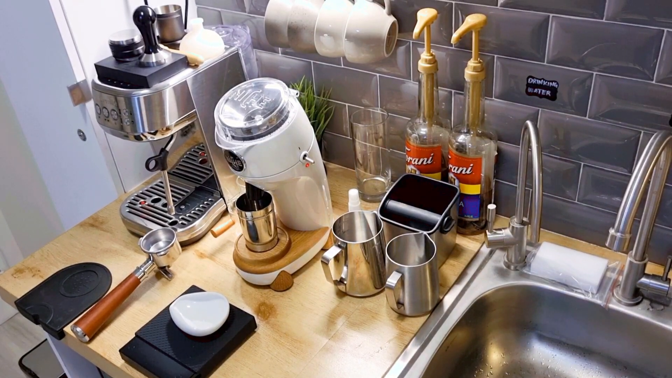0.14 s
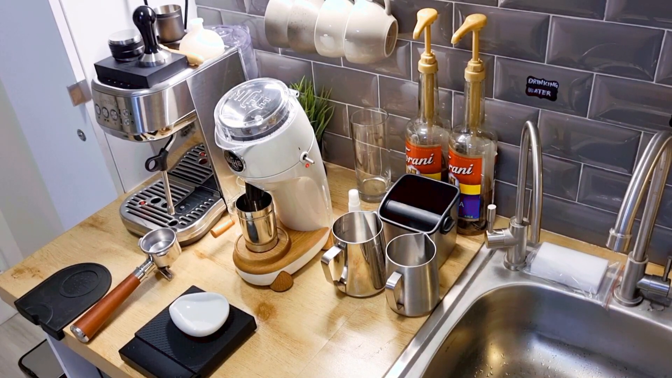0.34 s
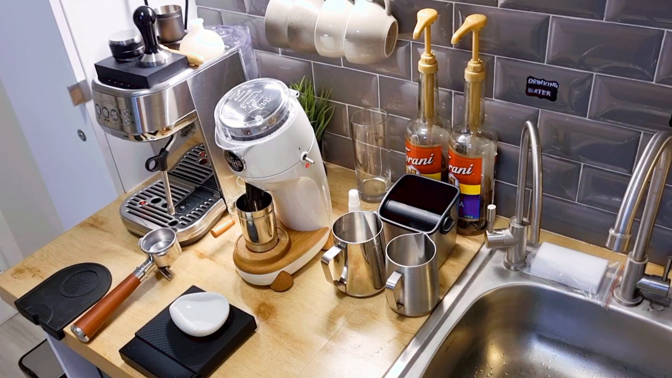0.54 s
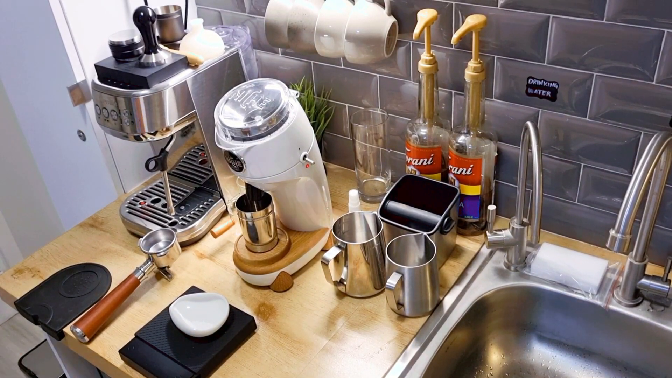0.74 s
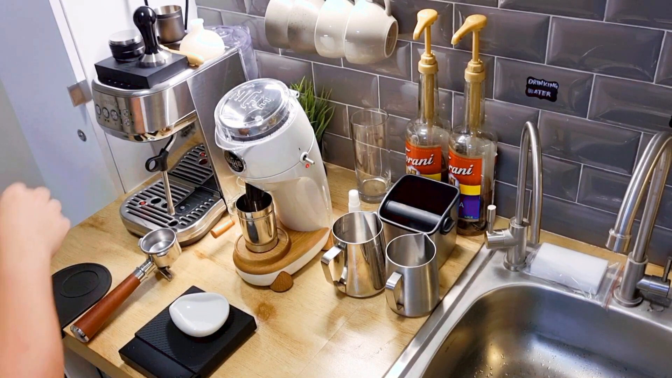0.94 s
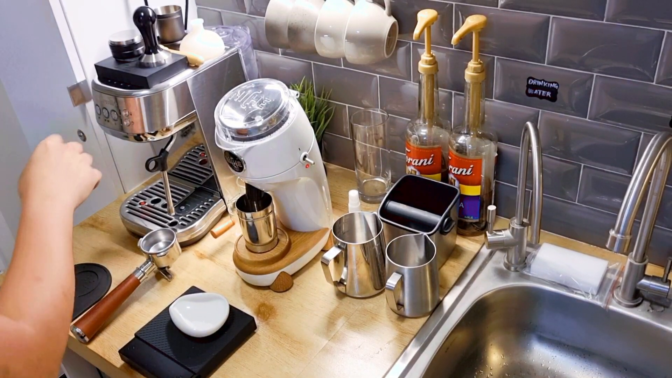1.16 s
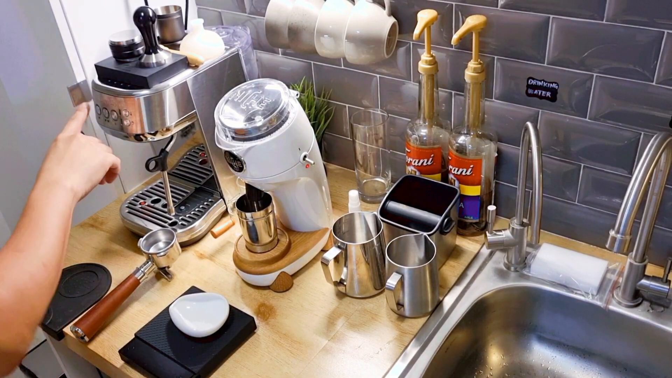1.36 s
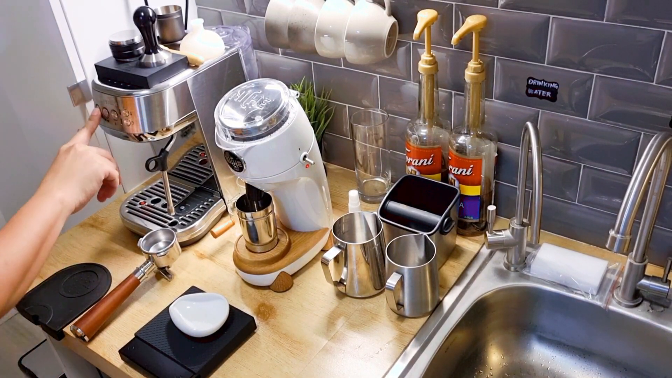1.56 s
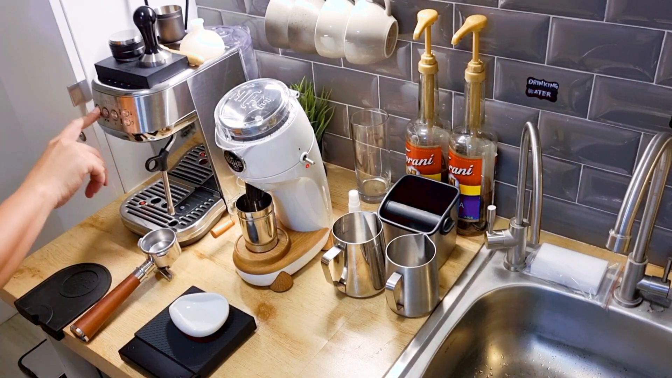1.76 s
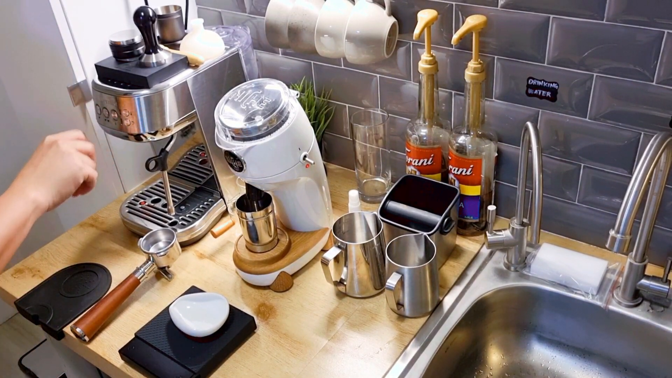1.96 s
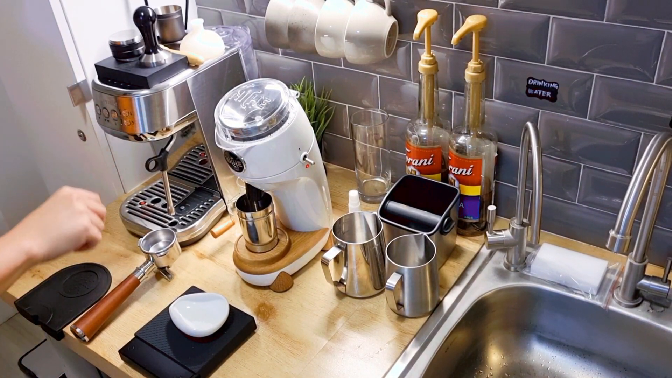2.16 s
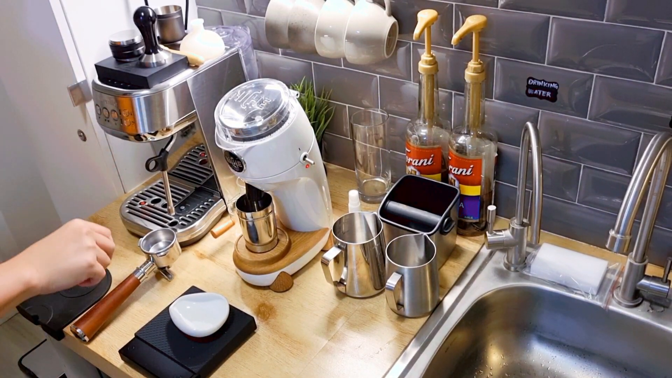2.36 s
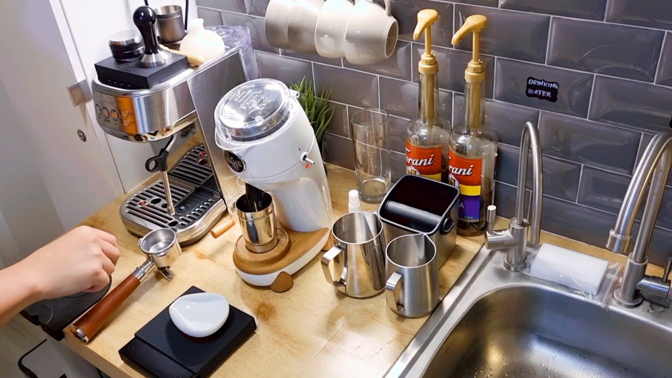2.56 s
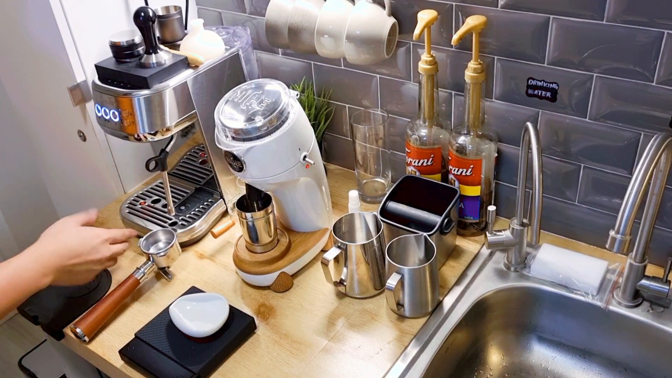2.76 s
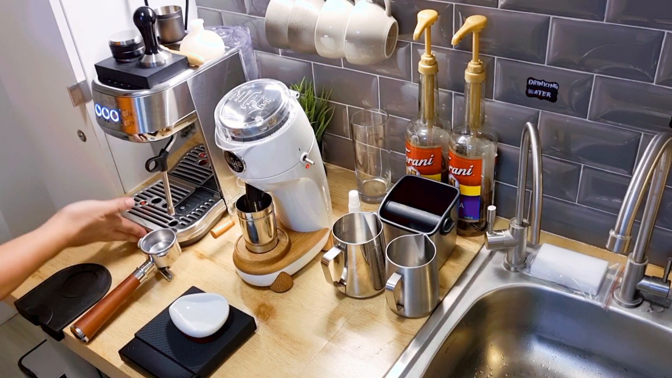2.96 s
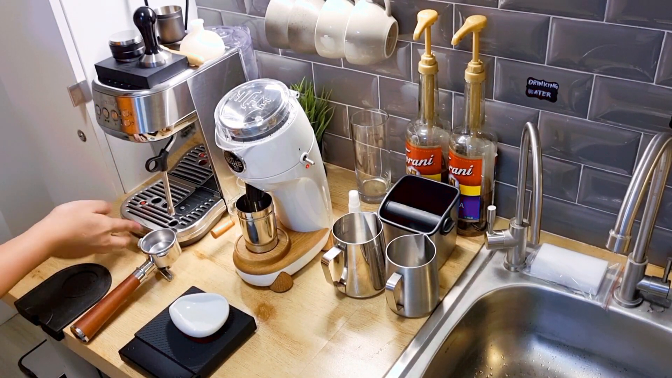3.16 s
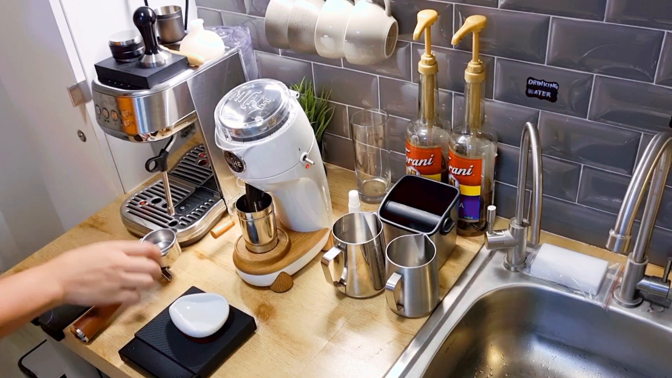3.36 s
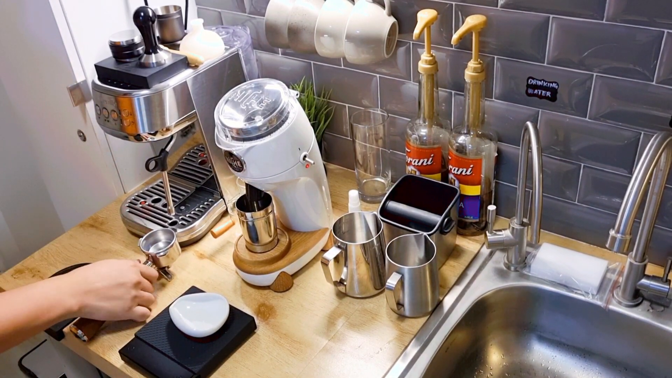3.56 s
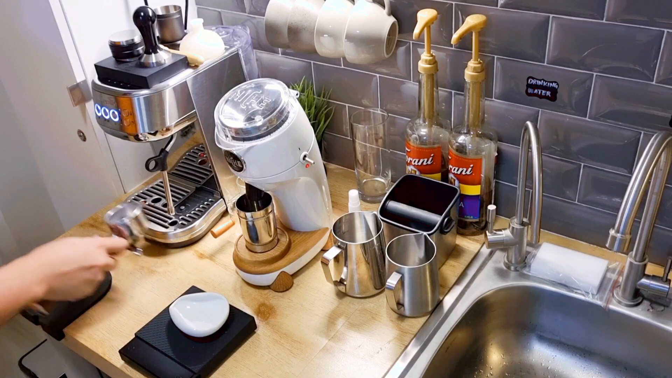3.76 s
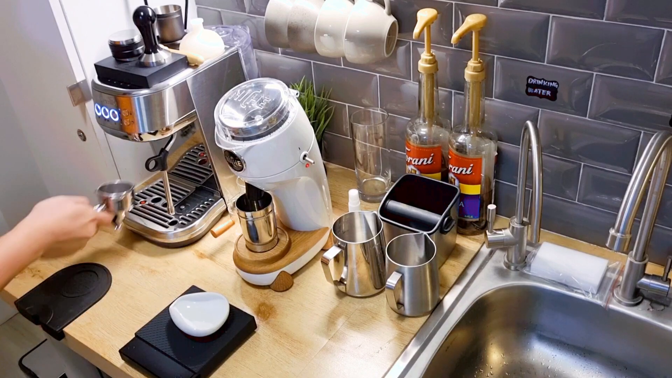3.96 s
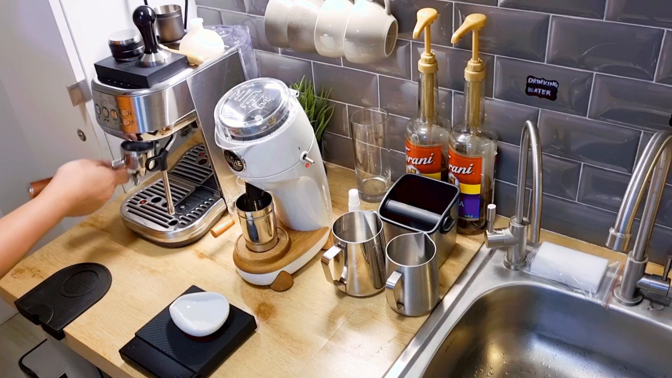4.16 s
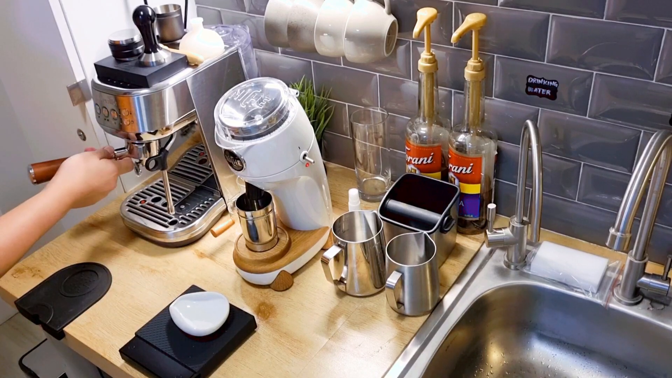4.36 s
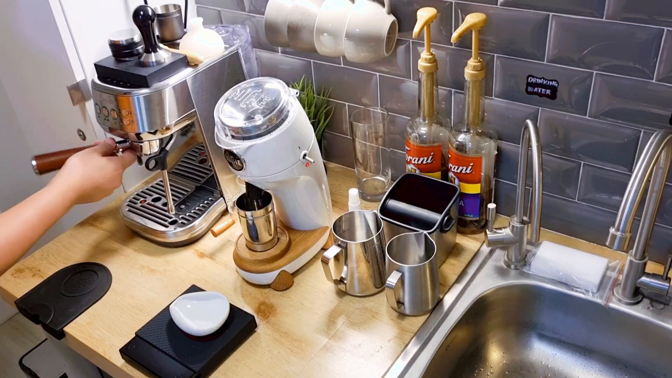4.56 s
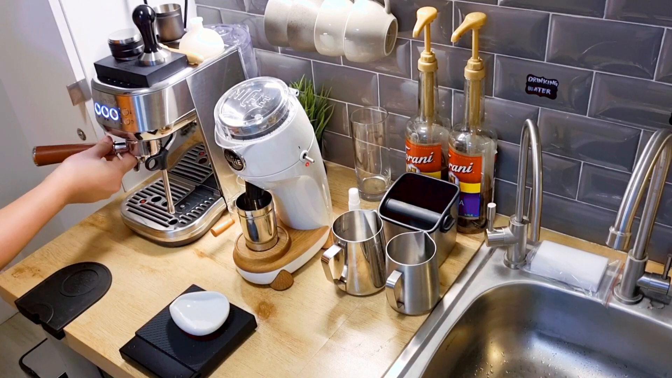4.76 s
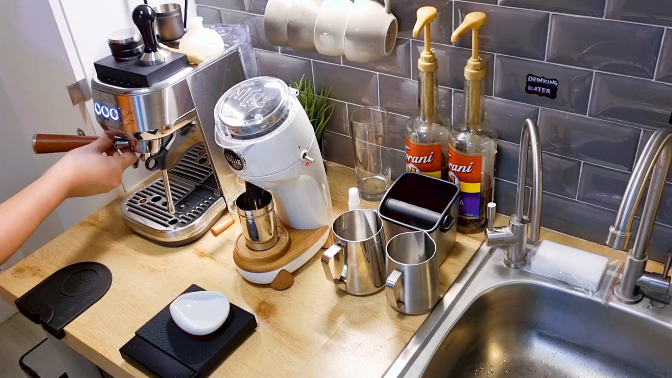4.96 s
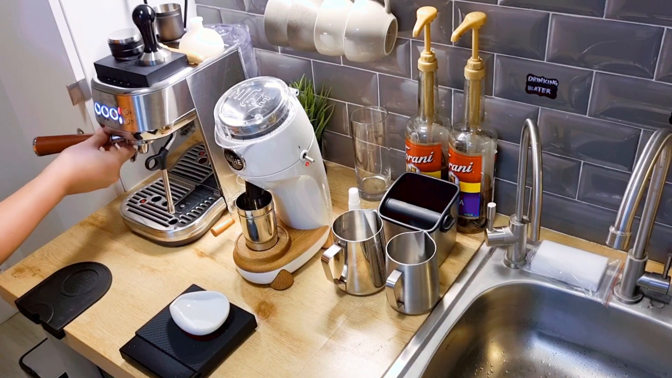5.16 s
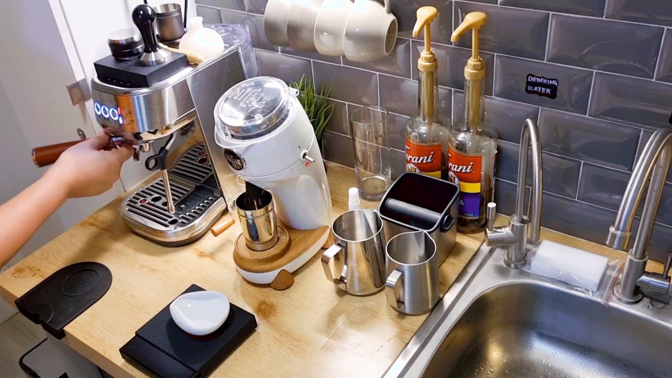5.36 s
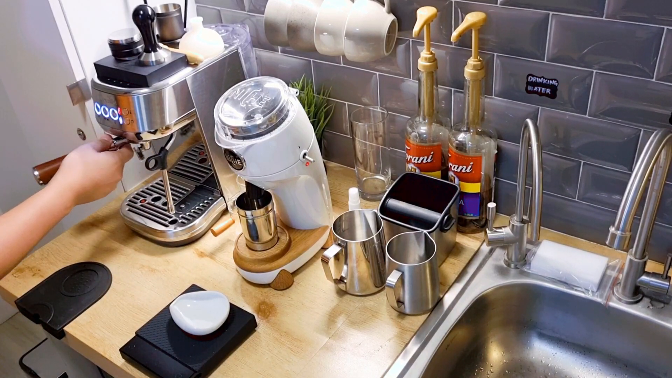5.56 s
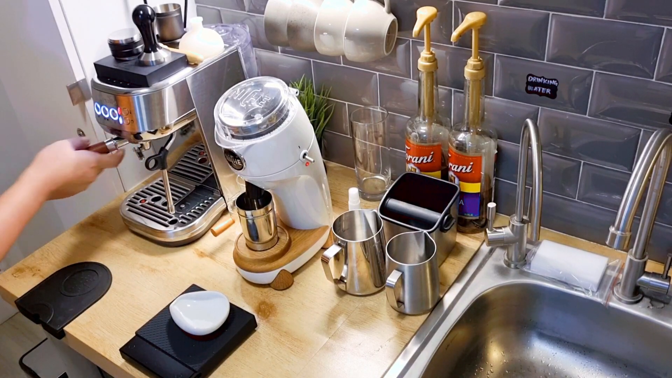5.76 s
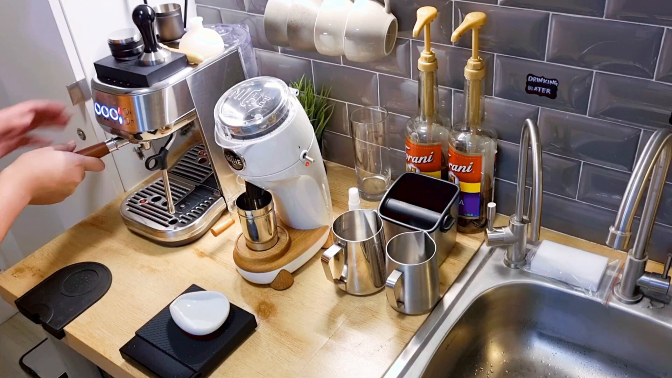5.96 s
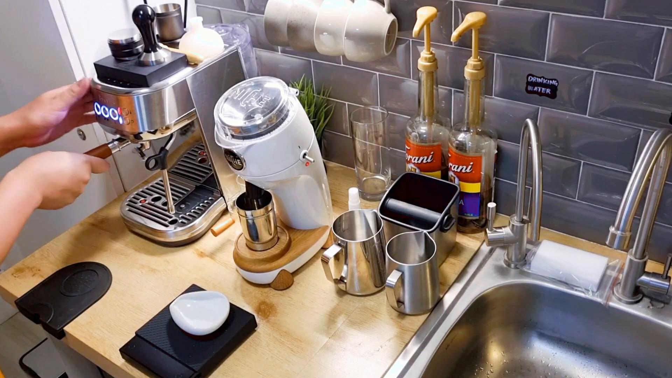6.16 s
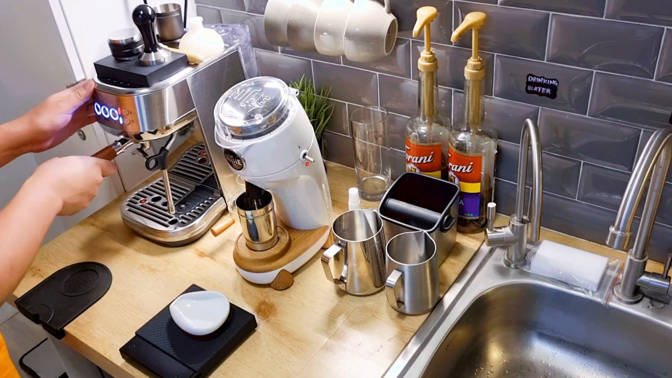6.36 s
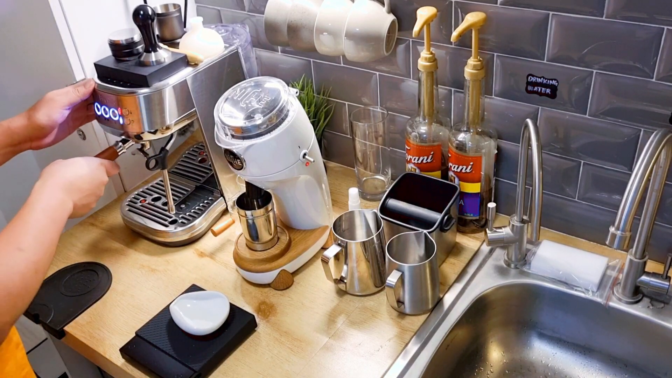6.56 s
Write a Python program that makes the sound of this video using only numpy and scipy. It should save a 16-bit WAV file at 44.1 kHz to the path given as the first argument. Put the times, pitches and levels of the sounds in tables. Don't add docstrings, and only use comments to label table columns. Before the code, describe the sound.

A small tiled kitchen with low, slowly swelling ventilation rumble and soft steady air, heard by spaced stereo microphones with plenty of room. From 0 to 1.4 seconds slippers and sleeves rub in uneven grainy scuffs, strongest near 1.2, with a light sole slap at 1.41. Around 1.7 a tiny tick leads into a tight cluster of switch clicks, snapping sharply at 1.81 and trailing off by 1.9. At 3.03 the drip tray jolts with a brief light rattle. A low counter boom at 3.56 precedes faint portafilter bumps to 3.73. At 4.33 steel strikes steel, the loudest clank, with a short thin ring and a settling knock. Sparse dull bumps follow, then a firm knock at 5.2 and a flurry of muffled twisting knocks from 5.4 to 5.7. Faint cloth rubbing and a tiny finger tap at 6.42 close over the rumble.

```python
import sys
import numpy as np
from scipy import signal
from scipy.fft import rfft, irfft, next_fast_len
from scipy.io import wavfile

SR = 44100
rng = np.random.default_rng(int(sys.argv[2]) if len(sys.argv) > 2 else 0)


def boost(x):
    u = np.asarray(x, float) / 20
    return 10 ** u


def put_to_file(sound):
    columns = np.atleast_2d(sound).T
    safe = np.clip(columns, -1, 1)
    whole_steps = np.round(safe * 32767)
    wavfile.write(sys.argv[1], SR, whole_steps.astype(np.int16))


N = 291501


def rms_one(x):
    return x / np.sqrt(np.mean(x ** 2) + 1e-20)


def at_hz(points, hz):
    curve_hz, value = np.transpose(points)
    return np.interp(np.log(hz + 1), np.log(curve_hz), value)


def coloured(x, spectrum):
    size = next_fast_len(x.shape[-1])
    gain = rms_one(boost(at_hz(spectrum, np.fft.rfftfreq(size, 1 / SR))))
    return irfft(rfft(x, size) * gain, size)[..., :x.shape[-1]]


def drift(rate_hz):
    steps = rng.standard_normal(int(N / SR * 40) + 2)
    smooth = signal.filtfilt([1], [1, -np.exp(-2 * np.pi * rate_hz / 40)], steps)
    return np.interp(np.arange(N) / SR * 40, np.arange(len(steps)), rms_one(smooth - smooth.mean()))


def ring(clicks, hz, t60):
    r = boost(-60 / (t60 * SR))
    w = 2 * np.pi * hz / SR
    return signal.lfilter([0, np.sin(w)], [1, -2 * r * np.cos(w), r * r], clicks + 1e-18)


FIRM_DB = -35


def contacts(table, modes, crack, thump_t60, rise_s, chatter_s, sharper, thump_db, ring_db, crack_db, first_db):
    thump, chatter = np.zeros(N), np.zeros((2, N))
    t = np.arange(4096) / SR
    shape = (len(table), len(t))
    grit = rng.standard_normal(shape) * np.sqrt(rng.exponential(1, shape))
    rise = 1 - np.exp(-t / rise_s)
    for (s, low_db, hz, click_db), clicks in zip(table, grit):
        start = round(s * SR)
        at = slice(start, start + len(t))
        thump[at] += boost(low_db + thump_db - 60 * t / thump_t60) * rise * np.sin(2 * np.pi * hz * t)
        first_touch = boost(first_db) * (t == 0)
        burst = boost(click_db) * (clicks * rise * np.exp(-t / chatter_s) + first_touch)
        firm_crack_db = crack_db + sharper * (click_db - FIRM_DB)
        chatter[:, at] += boost([[ring_db], [firm_crack_db]]) * burst
    rings = sum(boost(db) * ring(chatter[0], hz, t60) for hz, db, t60 in modes)
    return thump + rings + coloured(chatter[1], crack)


# (time [s], thump level [dB], thump pitch [Hz], click level [dB])
CLANK = [
    (4.3245, -42, 323, -26),
    (4.3305, -12.5, 265, -16),
    (4.346, -25, 284, -37),
    (4.383, -17.5, 261, -42.5),
]
# (frequency [Hz], level [dB], t60 [s])
CLANK_MODES = [(400, -7, 0.034), (497, -1.5, 0.021), (800, -3.5, 0.012), (1048, -7.5, 0.15),
               (1154, 0.5, 0.016), (1470, -15, 0.013), (1750, -9.5, 0.013), (2565, -31, .08),
               (2470, -35.5, 0.068), (4650, -52.5, .2), (4790, -31, 0.17), (4840, -37, .15),
               (5400, -40, .15), (7530, -44, 0.1)]
# (frequency [Hz], density [dB per Hz])
CLANK_CRACK = [(700, -43), (1300, 11.5), (2300, 6.5), (3300, -4.5), (4800, -7.5), (7000, -14.5),
               (9000, -24), (10500, -24), (13000, -24), (16000, -26)]


def portafilter_clank():
    return contacts(CLANK, CLANK_MODES, CLANK_CRACK, 0.071, rise_s=0.00061, chatter_s=0.005, sharper=-0.11,
                    thump_db=0.0, ring_db=-18.5, crack_db=0.9, first_db=14)


# (time [s], thump level [dB], thump pitch [Hz], click level [dB])
HEAD = [(4.281, -50, 186, -43.5), (4.543, -33.5, 197, -43), (4.644, -33, 272, -50.5),
        (4.854, -36, 250, -56), (5.008, -33.5, 227, -53), (5.016, -29, 233, -47.5),
        (5.202, -45, 252, -48.5), (5.206, -17, 253.3, -35), (5.225, -37, 313, -66), (5.251, -38, 242, -41),
        (5.269, -26.5, 312, -41), (5.382, -43, 180, -40.5), (5.399, -38, 229, -43),
        (5.427, -29.5, 244, -51), (5.467, -29, 247, -47.5), (5.521, -31, 240, -39), (5.546, -26, 180, -34),
        (5.562, -23.5, 272, -39), (5.619, -30.5, 267, -45), (5.648, -27.5, 259, -49),
        (5.678, -35.5, 257, -54.5)]
# (time [s], thump level [dB], thump pitch [Hz], click level [dB])
COUNTER = [
    (3.557, -28, 96, -47),
    (4.852, -28.5, 85, -64),
    (5.573, -25.5, 104, -60),
]
# (time [s], thump level [dB], thump pitch [Hz], click level [dB])
LIFT = [
    (3.651, -36, 519, -44.5),
    (3.669, -35, 400, -47),
    (3.693, -38, 560, -44),
    (3.725, -49, 487, -64),
]
# (frequency [Hz], level [dB], t60 [s])
HEAD_MODES = [(378, -6.5, 0.061), (450, 5, 0.02), (620, -3.5, 0.0037), (715, 1, 0.012), (862, -2.5, 0.0084),
              (1054, -3, 0.012), (1290, -6.5, 0.039), (1964, -12.5, 0.017)]
# (frequency [Hz], density [dB per Hz])
HEAD_CRACK = [(700, -50.5), (1300, 12), (2200, 4.5), (3300, -3), (5000, -14), (7000, -19.5), (9000, -32.5),
              (10500, -30), (13000, -30), (16000, -40)]


def portafilter_twist():
    return contacts(HEAD + COUNTER + LIFT, HEAD_MODES, HEAD_CRACK, 0.064, rise_s=0.0014, chatter_s=0.0093,
                    sharper=0.54, thump_db=2.0, ring_db=-17.5, crack_db=2.5, first_db=14)


# (time [s], thump level [dB], thump pitch [Hz], click level [dB])
SWITCH = [(1.68, -26.5, 510, -61), (1.719, -28.5, 470, -52), (1.778, -19, 446, -33),
          (1.789, -22.5, 315, -31), (1.8, -20, 623, -33.5), (1.8055, -25, 930, -24),
          (1.814, -17.5, 473, -18), (1.829, -20, 422, -34), (1.844, -25, 307, -42),
          (1.859, -25.5, 274, -29.5), (1.887, -27.5, 450, -30)]
# (frequency [Hz], level [dB], t60 [s])
SWITCH_MODES = [(560, -21, .03), (785, -4.5, 0.049), (980, 5.5, 0.011), (1330, -1, 0.01),
                (2380, -34, 0.018)]
# (frequency [Hz], density [dB per Hz])
SWITCH_CRACK = [(700, -43), (1300, 16), (2200, 9), (3300, 0.5), (5000, -7.5), (7000, -12.5), (9000, -23),
                (10500, -20), (13000, -18), (16000, -21)]


def switch_press():
    return contacts(SWITCH, SWITCH_MODES, SWITCH_CRACK, 0.024, rise_s=0.0012, chatter_s=0.0034, sharper=0.0089,
                    thump_db=1.5, ring_db=-21, crack_db=-1.0, first_db=18.5)


# (time [s], thump level [dB], thump pitch [Hz], click level [dB])
TRAY = [
    (3.031, -30, 407, -34.5),
    (3.045, -48, 382, -36.5),
    (3.057, -56, 555, -37.5),
    (3.28, -38, 278, -54),
]
# (frequency [Hz], level [dB], t60 [s])
TRAY_MODES = [(480, -18, 0.0094), (620, -4, 0.035), (803, 5, 0.018), (1127, 7, 0.01), (1270, -2.5, 0.02)]
# (frequency [Hz], density [dB per Hz])
TRAY_CRACK = [(700, -30), (1300, 11), (2200, 3.5), (3300, -2), (4700, -7.5), (7000, -13), (9000, -26),
              (10500, -23), (13000, -24), (16000, -25)]


def tray_nudge():
    return contacts(TRAY, TRAY_MODES, TRAY_CRACK, 0.03, rise_s=0.0002, chatter_s=0.01, sharper=1.0,
                    thump_db=-2.5, ring_db=-22.5, crack_db=4, first_db=13)


# (time [s], thump level [dB], thump pitch [Hz], click level [dB])
GRIP = [
    (6.346, -59, 304, -63),
    (6.4202, -59, 260, -45.5),
]


def housing_grip():
    return contacts(GRIP, HEAD_MODES, TRAY_CRACK, 0.051, rise_s=0.00025, chatter_s=0.0018, sharper=0.011,
                    thump_db=3.0, ring_db=-26, crack_db=-2, first_db=25)


# (time [s], thump level [dB], thump pitch [Hz], click level [dB])
STEP = [
    (1.412, -52, 400, -45),
    (1.4185, -55, 305, -35),
]
# (frequency [Hz], density [dB per Hz])
STEP_CRACK = [(700, -34), (1300, 4.5), (2200, -0.5), (3300, -6.5), (5000, -5.5), (7000, -11.5), (9000, -27),
              (10500, -22), (13000, -21), (16000, -23)]


def slipper_slap():
    return contacts(STEP, TRAY_MODES, STEP_CRACK, .03, rise_s=0.00024, chatter_s=0.0058, sharper=.01,
                    thump_db=-14.0, ring_db=-31, crack_db=-1, first_db=24)


# (time [s], thump level [dB], thump pitch [Hz], click level [dB])
TICK = [
    (1.709, -48, 480, -47),
]
# (frequency [Hz], level [dB], t60 [s])
TICK_MODES = [(3100, -7, .005), (3800, -3.5, .005), (4430, -9, 0.0052)]


def small_tick():
    return contacts(TICK, TICK_MODES, STEP_CRACK, 0.025, rise_s=.0002, chatter_s=.002, sharper=0,
                    thump_db=-3, ring_db=-14, crack_db=-4, first_db=23.5)


# (start [s], swell [s], level [dB], extra fine hiss [dB])
STROKES = [(.08, 0.21, -69.5, 1.5), (0.491, 0.085, -54, -1), (.72, 0.054, -53.5, 1.5),
           (0.843, 0.0081, -49.5, -2.5), (1.192, 0.11, -44, 1.5), (1.33, 0.05, -61, -3.5),
           (1.6, 0.085, -53.5, -1.5), (1.95, 0.013, -60.5, -6), (2.05, 0.22, -74.5, 4.5),
           (3.12, 0.017, -74, 1.5), (3.26, 0.022, -69, -4), (5.78, 0.16, -75.5, 14),
           (5.96, 0.014, -65.5, 1), (6.32, 0.022, -70, -2)]
RUSTLE_DB, RUSTLE_FADE_DB_PER_S = -68.5, 0.72
STROKE_ATTACK_S, STROKE_SWELL_DB = 0.0085, 11
STROKE_FADE_DB_PER_S, HISS_FADE_DB_PER_S = 134, 177


def strokes(drag_follows, drag_db, hiss_follows, hiss_db, uneven_db):
    t = np.arange(N) / SR
    level = boost(RUSTLE_DB - RUSTLE_FADE_DB_PER_S * t) * boost([[0], [drag_db], [hiss_db]])
    fades = np.array([[STROKE_FADE_DB_PER_S], [STROKE_FADE_DB_PER_S], [HISS_FADE_DB_PER_S]])
    for s, swell_s, db, fine_db in STROKES:
        above = db - RUSTLE_DB
        drag_peak = drag_db + drag_follows * above - fine_db
        hiss_peak = hiss_db + hiss_follows * above + fine_db
        peak_db = db + np.array([[0], [drag_peak], [hiss_peak]])
        before_peak_db = STROKE_SWELL_DB * np.clip(1 - (t - s) / swell_s, 0, 1) ** 2
        after_peak_db = fades * np.maximum(t - s - swell_s, 0)
        attack = np.clip((t - s) / STROKE_ATTACK_S, 0, 1)
        level += attack * boost(peak_db - before_peak_db - after_peak_db)
    return level * boost(uneven_db * drift(12))


# (frequency [Hz], density [dB per Hz])
SCUFF_COLOUR = [(700, -44), (1200, -4), (2000, -3.5), (3200, 4.5), (4500, -3.5), (6500, -10.5), (8500, -30),
                (10000, -44)]
# (frequency [Hz], density [dB per Hz])
DRAG_COLOUR = [(200, -38.5), (350, 5.5), (500, -5.5), (900, -1), (1500, -10.5), (2500, -73)]
# (frequency [Hz], density [dB per Hz])
HISS_COLOUR = [(7000, -36.5), (9000, -10), (10500, -2), (13000, 5), (16000, -2)]


def rubbing(level, grain):
    grains = rms_one(rng.standard_normal((3, N)) * rng.exponential(1, (3, N)) ** grain)
    colours = [SCUFF_COLOUR, DRAG_COLOUR, HISS_COLOUR]
    return sum(coloured(x, colour) for x, colour in zip(level * grains, colours))


# (time [s], level [dB])
RUMBLE = [(0.0, -46.5), (0.9, -39.5), (1.45, -48), (1.75, -41), (3.28, -46), (3.54, -43), (3.88, -43.5),
          (4.57, -44.5), (6.22, -46.5), (6.61, -43.5)]
# (frequency [Hz], width [Hz], level [dB])
ROOM_MODES = [(37.7, 7, -17), (66.4, 6.9, -2.5), (92.16, 11.9, 1), (109.8, 7.4, -19), (192, 21.5, -12),
              (269.6, 4.6, -13), (335.7, 15, -22)]


def rumble(patchy_db):
    out = 0
    for hz, width_hz, db in ROOM_MODES:
        mode = ring(rng.standard_normal((2, N)), hz, 1.73 / width_hz)
        mode = ring(mode, hz, 1.0 / width_hz)
        out = out + boost(db + patchy_db * drift(2.0)) * rms_one(mode)
    s, level_db = np.transpose(RUMBLE)
    return boost(np.interp(np.arange(N) / SR, s, level_db) + 3.5) * rms_one(out)


# (frequency [Hz], density [dB per Hz])
AIR = [(70, -37), (130, -12.5), (190, -5.5), (230, -3), (270, 0), (400, -6), (900, -6.5), (1600, -14.5),
       (3000, -20.5), (5000, -37.5), (7000, -54), (9000, -69), (13000, -59), (16000, -39.5)]


def air():
    return boost(-51.5 + 1.1 * drift(12)) * coloured(rng.standard_normal((2, N)), AIR)


# (frequency [Hz], left-right likeness [0-1])
LIKENESS = [(60, 0.98), (130, 0.98), (290, 0.79), (640, 0.51), (1400, 0.3), (3000, 0.041), (7000, 0.016),
            (15000, .05)]
# (frequency [Hz], left minus right [dB])
LEAN = [(60, -5.5), (150, -3.5), (380, -3), (950, -2), (2380, -2), (5980, 2.5), (15000, 7.5)]
PORT_LAG_S = 0.000404


def ports(two):
    margin = 4096
    wide = np.pad(two, [(0, 0), (margin, margin)], "reflect")
    size = next_fast_len(wide.shape[1])
    hz = np.fft.rfftfreq(size, 1 / SR)
    alike = np.clip(at_hz(LIKENESS, hz), 0, .995)
    lean = boost(at_hz(LEAN, hz) / 2)
    mid, side = rfft(wide, size) * np.sqrt([(1 + alike) / 2, (1 - alike) / 2])
    late = np.exp(-2j * np.pi * hz * PORT_LAG_S)
    both = irfft([(mid + side) * lean, (mid - side) / lean * late], size)
    return both[:, margin:margin + two.shape[1]]


# (frequency [Hz], level [dB])
KITCHEN_DB = [(100, -13), (260, -6.5), (600, -3.5), (1500, -3.5), (4000, 4.5), (14000, 0.5)]
# (frequency [Hz], t60 [s])
KITCHEN_T60 = [(100, 0.57), (260, 0.51), (600, 0.46), (1500, 0.35), (4000, 0.38), (8000, 0.18),
               (14000, 0.28)]


def kitchen(x, direct_db, build_s, build_turns, lag_s, lean_db):
    t, tail = np.arange(2 ** 15) / SR, 0
    noise = [ports(rng.standard_normal((2, len(t)))) for draw in range(2)]
    edges = 60 * 2. ** np.arange(0, 8.6, .5)
    for k, (low, high) in enumerate(zip(edges, edges[1:])):
        band_pass = signal.butter(2, [low, min(high, 20000)], "band", fs=SR, output="sos")
        band = signal.sosfilt(band_pass, noise[k % 2])
        hz = np.sqrt(low * high)
        build = 1 - np.exp(-t / (build_s + build_turns / hz))
        tail = tail + band * build * boost(at_hz(KITCHEN_DB, hz) - 60 * t / at_hz(KITCHEN_T60, hz))
    tail = tail / 20
    tail[0, 0] += boost(direct_db + lean_db / 2)
    tail[1, round(lag_s * SR)] += boost(direct_db - lean_db / 2)
    return signal.fftconvolve(x[None], tail, axes=1)[:, :N]


def scene():
    hits = portafilter_clank() + portafilter_twist() + switch_press() + tray_nudge()
    hits = hits + housing_grip() + slipper_slap() + small_tick()
    room = kitchen(hits, direct_db=-0.5, build_s=0.00073, build_turns=1.6, lag_s=.0003, lean_db=-4.5)
    pressure = strokes(drag_follows=-0.55, drag_db=10.5, hiss_follows=0.12, hiss_db=-16.0, uneven_db=0.97)
    rubs = np.array([rubbing(pressure, grain=0.78) for side in range(2)])
    return room + ports(rubs + air() + rumble(patchy_db=2.38))


def top_cut(x):
    return signal.sosfilt(signal.butter(12, 16570, fs=SR, output="sos"), x)


def record(dry):
    thin = signal.sosfilt(signal.butter(4, 33, "high", fs=SR, output="sos"), dry)
    cut = signal.sosfilt(signal.ellip(12, .5, 60, 15830, fs=SR, output="sos"), thin)
    mix = cut * np.clip((N - np.arange(N)) / 200, 0, 1)
    return top_cut(mix)


dry = scene()
out = record(dry)
put_to_file(out)
```